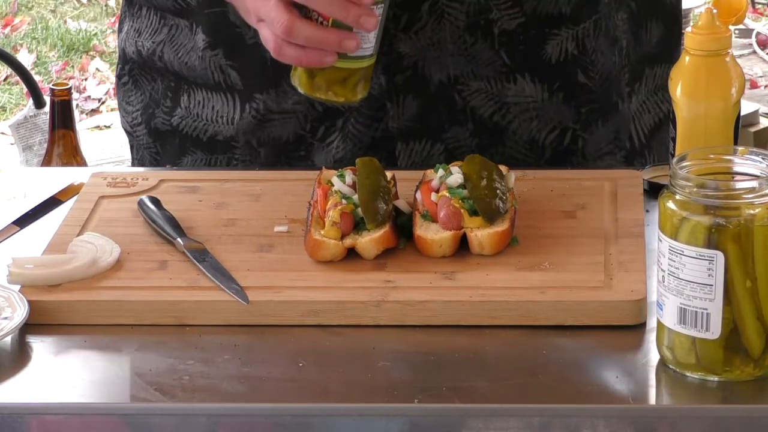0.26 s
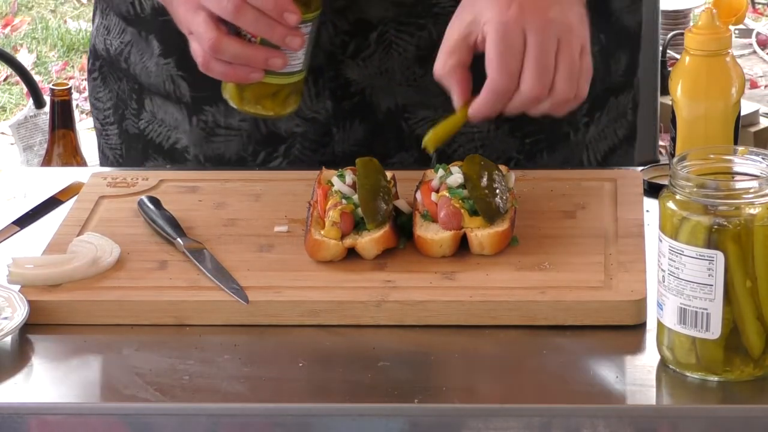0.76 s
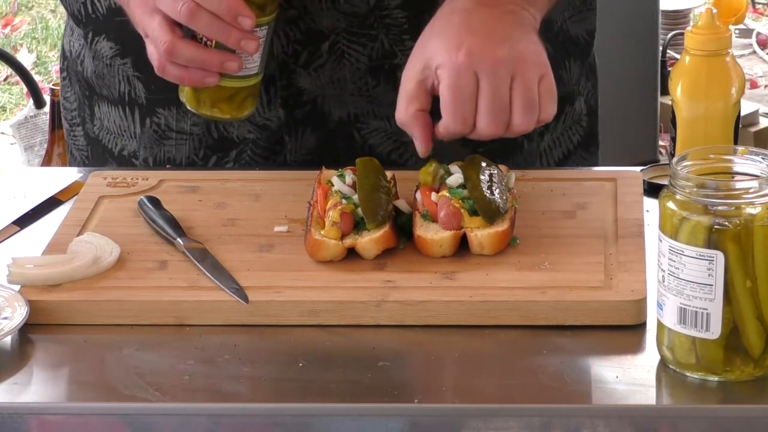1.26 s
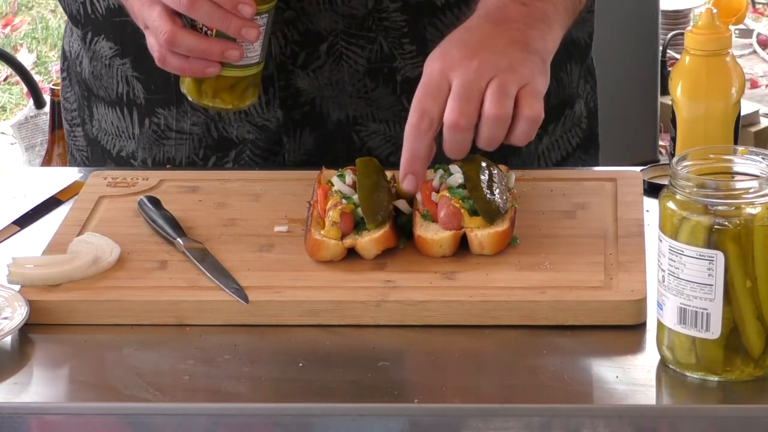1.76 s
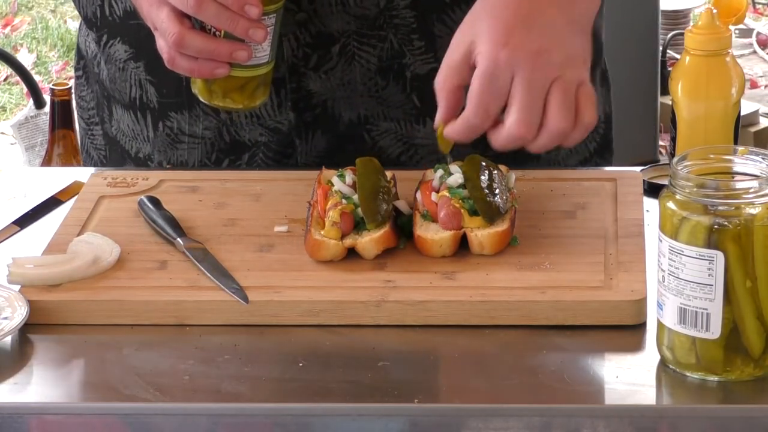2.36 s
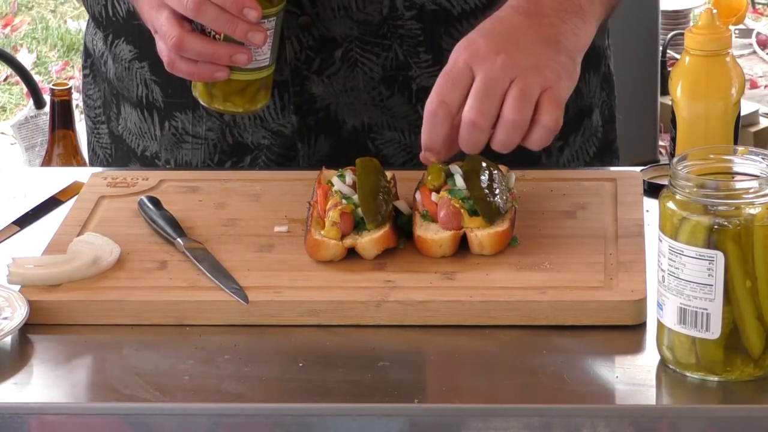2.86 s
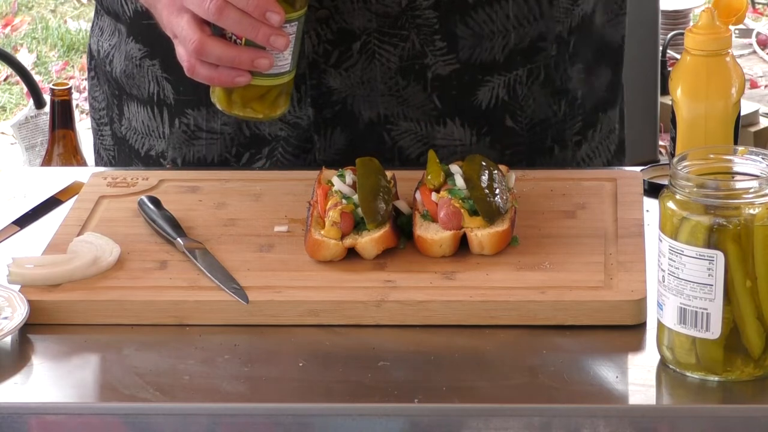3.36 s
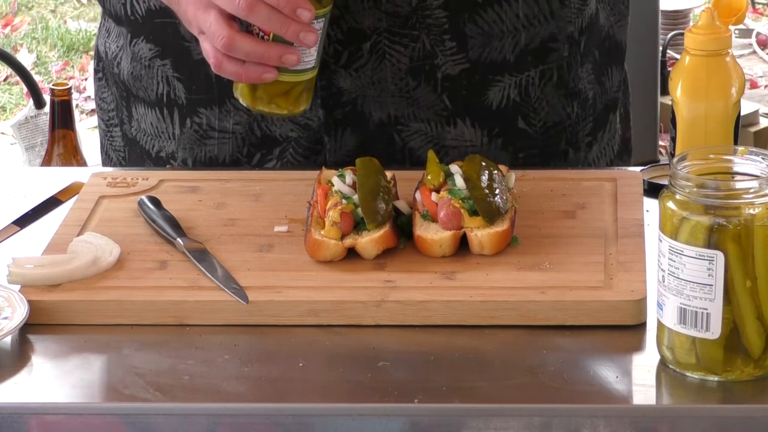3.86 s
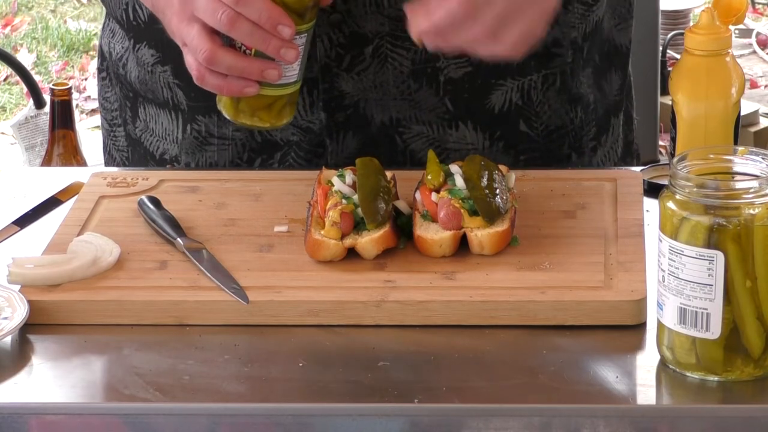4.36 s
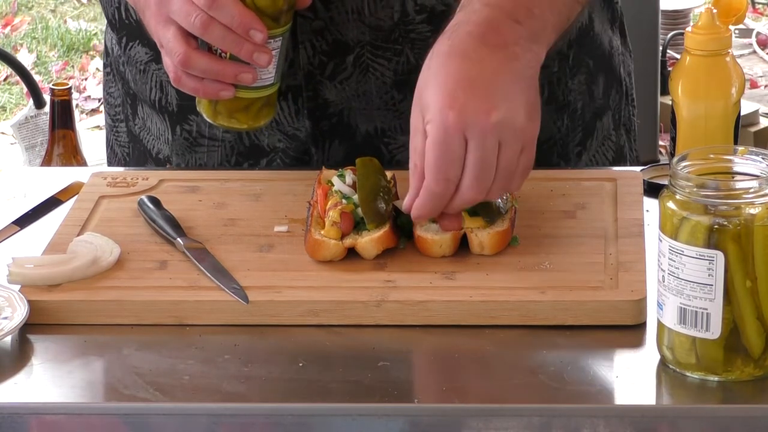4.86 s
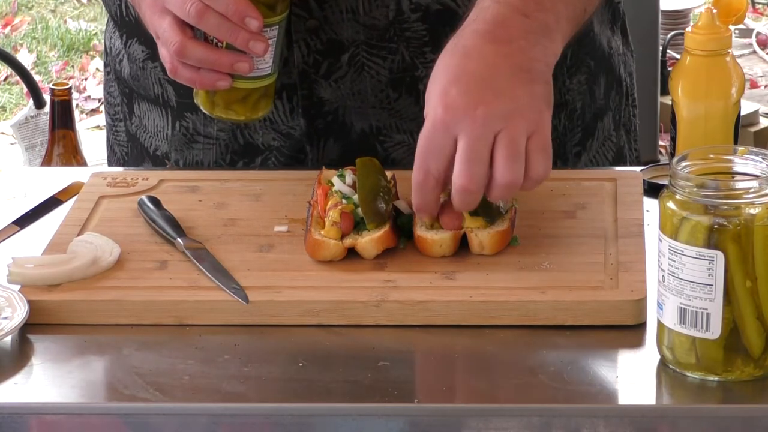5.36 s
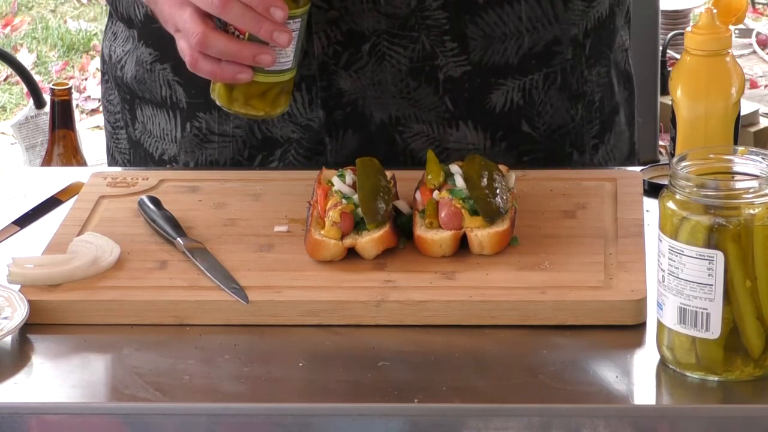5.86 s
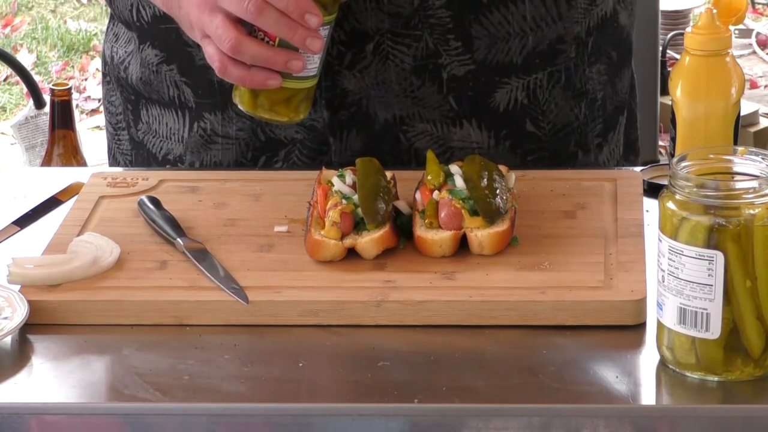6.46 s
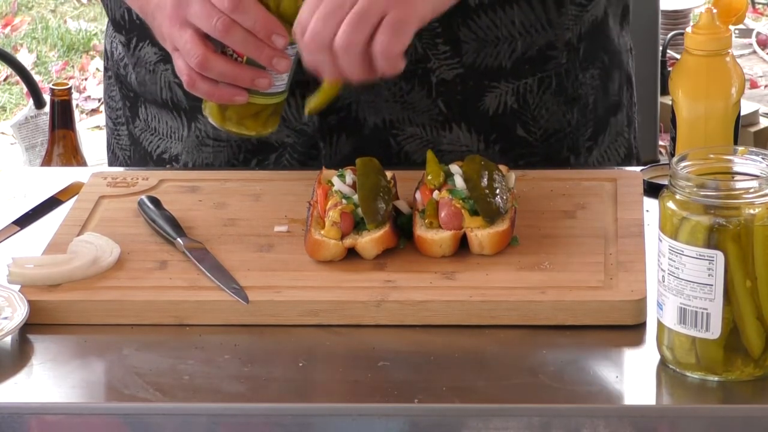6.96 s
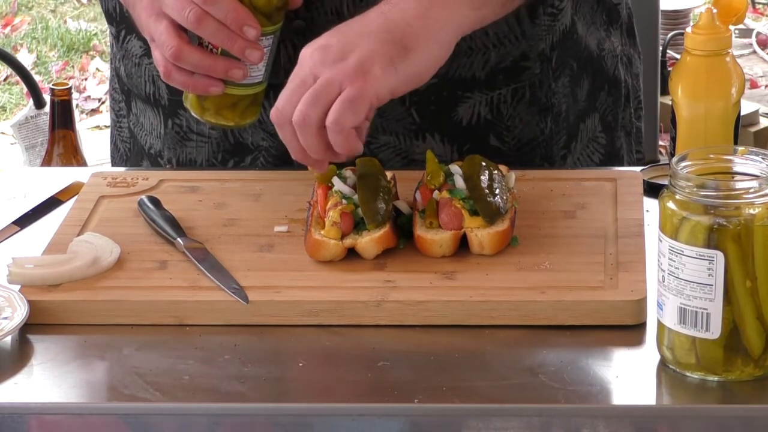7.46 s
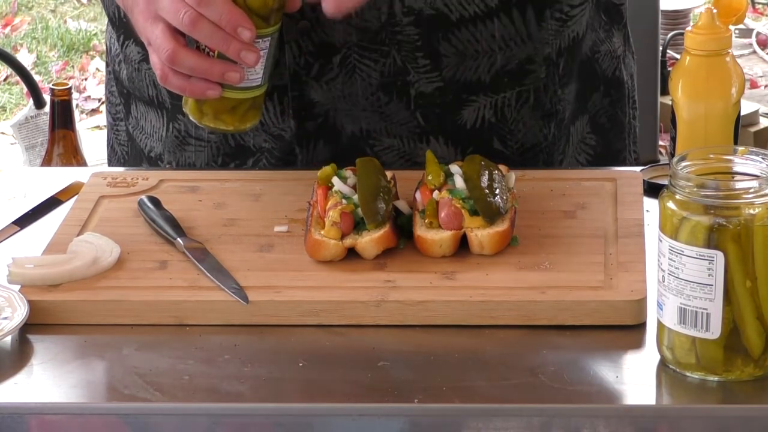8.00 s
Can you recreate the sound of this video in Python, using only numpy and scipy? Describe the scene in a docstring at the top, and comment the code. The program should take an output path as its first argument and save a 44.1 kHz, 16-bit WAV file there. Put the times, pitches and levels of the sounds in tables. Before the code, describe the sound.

Soft hand brushes and wet pickle squeaks sound over a far plane's low, swelling hum, hissing leaves and thin insect trills.

```python
"""Distant plane over a back yard

A far engine, probably a propeller plane, drones past while someone lays pickles on hot dogs.
Its low note sinks slowly, swelling and fading as paths through the air add and cancel, over a soft roar.
Close by, the hands make soft brushes, wet clicks and squeaks. Insects trill and tick; leaves hiss."""
import sys
import numpy as np
from scipy import signal
from scipy.fft import rfft, irfft, next_fast_len
from scipy.io import wavfile

SR = 44100
rng = np.random.default_rng(int(sys.argv[2]) if len(sys.argv) > 2 else 0)


def inscribe(sig):
    """Save sig as 16-bit PCM at rate SR to the path in sys.argv[1].

    A 1-D sig is mono; a 2-D sig holds one channel per row.
    Samples are clipped to [-1, 1] before scaling.
    """
    pcm = np.round(np.clip(np.atleast_2d(sig).T, -1, 1) * 32767)
    wavfile.write(sys.argv[1], SR, pcm.astype(np.int16))


N = 363119
TIME = np.arange(N) / SR

# Fader rides for the plane's low note, its octave and its upper harmonics: t/s, level/dB
LOW_NOTE_RIDE = [(0, -32.5), (.55, -34), (1.05, -27.5), (2.45, -26.5), (2.8, -21.5), (6.5, -21),
                 (8.23, -22)]
OCTAVE_RIDE = [(0, -39), (1.15, -39.5), (2.15, -42.5), (2.8, -51.5), (3.4, -42), (4.8, -37.5), (7.3, -37.5),
               (7.9, -44), (8.23, -38.5)]
UPPER_RIDE = [(0, -59), (1.85, -52), (2.5, -43.5), (3.9, -47), (5.0, -54.5), (5.55, -44), (5.9, -49),
              (6.5, -39.5), (7.1, -48.5), (7.65, -45)]


def propeller(start_hz=94.3, sag_hz_per_s=0.69, wander_hz=0.2, fourth_db=-11.5):
    """Four harmonics of the blade rate, sinking as the plane goes by and fluttering in turbulent air."""
    blade_hz = start_hz - sag_hz_per_s * TIME + wander_hz * drift(0.85)
    phase = 2 * np.pi * np.cumsum(blade_hz) / SR

    def harmonic(level_db, order, flutter, flutter_hz):
        """A steady direct path plus scattered sound."""
        scatter = flutter * (drift(flutter_hz) + 1j * drift(flutter_hz))
        path = (1 + scatter) / np.sqrt(1 + 2 * flutter ** 2)
        tone = np.exp(1j * (order * phase + 2 * np.pi * rng.random()))
        return np.sqrt(2) * amp(level_db) * (path * tone).real

    low_db = curve(LOW_NOTE_RIDE) + interference(order=1)
    octave_db = curve(OCTAVE_RIDE) + interference(order=2)
    upper_db = curve(UPPER_RIDE)
    return (harmonic(low_db, order=1, flutter=0.087, flutter_hz=9.7)
            + harmonic(octave_db, order=2, flutter=0.24, flutter_hz=10)
            + harmonic(upper_db, order=3, flutter=0.9, flutter_hz=10.4)
            + harmonic(upper_db + fourth_db, order=4, flutter=0.7, flutter_hz=21))


# Air paths add up and the drone blooms: t/s, half width/s, low note gain/dB, octave gain/dB
PATH_SWELLS = [(1.802, 0.31, 5.5, -1), (3.71, 0.073, 6, 2.5), (4.01, 0.062, 2, 9.5), (4.6, 0.18, 11, 6),
               (5.35, 0.082, -3, 6), (6.02, 0.22, 9, 10), (6.56, 0.08, 1.5, 8.5), (8.17, 0.12, 1.5, 10)]
# Air paths cancel and a harmonic drops out: t/s, half width/s, low note gain/dB, octave gain/dB
PATH_FADES = [(.48, 0.14, -17, -2.5), (.76, 0.27, 2.5, -9.5), (1.76, 0.3, -1.5, -12),
              (3.87, .06, -3.5, -20), (4.22, 0.24, -20, -5.5), (5.08, .36, -19, -9.5),
              (5.66, 0.11, 0.5, -16), (6.3, 0.18, -0.5, -20), (6.92, 0.1, -1, -12), (7.14, .15, -25, 0),
              (7.44, 0.2, -7, -0.5)]


def interference(order):
    """Gain in dB on the first or second harmonic as paths through the air slip in and out of phase."""
    gain_db = np.zeros(N)
    for s, width, *db in PATH_SWELLS:
        gain_db += db[order - 1] * bell((TIME - s) / width)
    for s, width, *db in PATH_FADES:
        slip = ((TIME - s) / width) ** 2
        gain_db += 10 * np.log10((slip + amp(db[order - 1]) ** 2) / (slip + 1))  # notch, wide shoulders
    return gain_db


# Wet clicks and squeaks of the pickles: t/s, level/dB, f/Hz, width/Hz, attack/s, decay/s
PICKLE_SQUEAKS = [(.322, -41, 2200, 900, .001, .003), (.587, -44.5, 3200, 1000, .002, .008),
                  (.648, -54, 12850, 260, .003, .025), (2.902, -41, 3000, 900, .001, .005),
                  (3.672, -39, 6570, 180, .002, .004), (3.672, -41, 4350, 250, .002, .006),
                  (4.261, -42, 1650, 600, .002, .004), (4.261, -42, 3450, 800, .002, .005),
                  (5.002, -45, 3100, 900, .001, .004), (5.962, -42, 4300, 140, .008, .018),
                  (7.31, -61, 14000, 400, .03, .03)]


def pickle_squeaks(size=4096, rasp_gain=0.75):
    """Wet skin slips: a wavering ring and a short rasp in the same band."""
    out, t = np.zeros(N), np.arange(size) / SR
    for s, db, hz, width, attack, decay in PICKLE_SQUEAKS:
        waver = noise(lambda f: bell(f / width), size)
        ring = np.sin(2 * np.pi * np.cumsum(hz + 0.5 * width * waver) / SR)
        rasp = noise(lambda f: bell(0.5 * (f - hz) / width), size)
        envelope = np.minimum(t / attack, 1) * np.exp(-np.maximum(t - attack, 0) / decay)
        add(out, s, amp(db) * (ring + rasp_gain * rasp) * envelope)
    return out


# Soft brushes of hand, apron and jar: t/s, length/s, level/dB, f/Hz, width/octaves
HAND_BRUSHES = [(0.123, 0.038, -51, 1980, 0.78), (0.554, .18, -45, 630, 0.34),
                (2.236, 0.18, -38.5, 526, 0.67), (4.096, 0.16, -48, 600, .5),
                (5.958, 0.055, -42.5, 2110, .3), (6.56, .03, -46, 3080, .3), (6.628, 0.059, -42, 3370, .45),
                (7.72, 0.19, -42.5, 436, 0.29), (7.829, .09, -37.5, 750, 0.77),
                (7.84, 0.083, -48, 3000, .35)]


def hand_brushes(grain=0.17):
    """Surfaces rub: short, grainy bands of noise that ease in and out."""
    out = np.zeros(N)
    for s, length, db, hz, octaves in HAND_BRUSHES:
        size = int(length * SR)
        rub = noise(lambda f: bell(np.log2(f / hz) / octaves), size)
        add(out, s, amp(db) * rub * signal.windows.tukey(size, 0.7))
    return out * (1 + grain * drift(120))


# Cues for the clearest ticks in the grass: t/s, level/dB
CLEAR_TICKS = [(.408, -54), (.8155, -53), (1.0755, -51), (1.8312, -52), (1.9854, -46), (2.2383, -49),
               (2.5376, -47.5), (2.6519, -49), (2.7731, -47.5), (2.8185, -45.5), (3.255, -43.5),
               (3.7125, -50), (3.91, -52), (5.1074, -49), (5.2724, -49), (5.3148, -49), (5.4794, -47.5),
               (5.6635, -48.5), (6.5894, -49), (7.5018, -48), (7.7503, -48.5), (8.078, -48)]
# Their thin, bright EQ: f/Hz, gain/dB
TICK_EQ = [(3500, -34), (6500, -0.5), (9000, -2), (11000, 1), (13000, 1), (14200, -5), (15800, -14)]


def insect_ticks(attack_s=0.0008, snap_s=0.005, tail_s=0.039, tail=0.56, grain=0.27, faint_count=56):
    """Tiny dry rasps with a quick snap and a short outdoor tail; fainter ones fall at random."""
    power, t = np.zeros(N), np.arange(6000) / SR
    release = (1 - tail) * np.exp(-t / snap_s) + tail * np.exp(-t / tail_s)
    envelope = np.minimum(t / attack_s, 1) * release
    jitter, weakness = rng.random((faint_count, 2)).T
    faint_at = ((np.arange(faint_count) + jitter) / faint_count * N).astype(int)
    faint_db = curve(BED_RIDE, column=2)[faint_at] - 1 - 7 * weakness  # 1 to 8 dB under the hiss fader
    for s, db in list(CLEAR_TICKS) + list(zip(TIME[faint_at], faint_db)):
        add(power, s, (amp(db) * envelope) ** 2)
    rasp = coloured(TICK_EQ) * np.sqrt(power) * (1 + grain * drift(300))
    return reflections(rasp, wet=0.27)


# Fader rides for the background bed: t/s, roar level/dB, hiss level/dB
BED_RIDE = [(0, -42, -50), (.5, -42.5, -53.5), (1.9, -41, -50.5), (2.45, -36.5, -49), (3.3, -36.5, -46.5),
            (6, -36.5, -47.5), (8.23, -34, -47)]
# EQ of the dark engine roar and of the bright leaf hiss: f/Hz, gain/dB
ROAR_EQ = [(30, 2), (48, 5.5), (73, 10.5), (100, 10.5), (125, 1.5), (235, 0), (305, -5), (370, -2),
           (520, -6.5), (950, -10), (1200, -10.5), (1450, -19), (2500, -30), (6000, -45.5)]
HISS_EQ = [(400, -7.5), (1200, 1.5), (1900, 1), (2700, 2), (3300, 2.5), (3900, -2.5), (5400, -4.5),
           (6100, -6.5), (7700, -8), (9000, -12.5), (10300, -12), (12600, -12), (14600, -17), (15800, -11)]


def roar_and_hiss(roar_waver_db=0.89, hiss_waver_db=0.61):
    """The engine's dull roar and a hiss of leaves and air, both wavering a little."""
    roar = coloured(ROAR_EQ) * amp(curve(BED_RIDE, column=1) + roar_waver_db * drift(2.7))
    hiss = coloured(HISS_EQ) * amp(curve(BED_RIDE, column=2) + hiss_waver_db * drift(4.3))
    return roar + reflections(hiss, wet=0.23)


# Far insect voices: f/Hz, width/Hz, start level/dB, midway level/dB, end level/dB
TRILL_BANDS = [(2750, 24, -72, -64.5, -68), (4520, 70, -70, -63.5, -71), (4635, 50, -74, -65, -72),
               (5165, 70, -67, -65, -65), (5238, 34, -65.5, -62.5, -60.5), (5440, 60, -76, -69, -76),
               (6342, 40, -82, -63.5, -68), (6880, 90, -80, -72, -73)]


def insect_trills(swell_db=1.5):
    """Far trills blur into narrow, shimmering bands that wax and wane."""
    out = np.zeros(N)
    for hz, width, *db in TRILL_BANDS:
        ride_db = np.interp(TIME, np.linspace(0, TIME[-1], len(db)), db)
        out += amp(ride_db + swell_db * drift(3.5)) * noise(lambda f: bell(2 * (f - hz) / width))
    return out


def reflections(x, wet, count=30, spread_s=0.013):
    """Early echoes off the table, board and jars ripple the spectrum."""
    size = int(spread_s * SR)
    taps = np.zeros(size)
    taps[rng.integers(1, size, count)] = rng.standard_normal(count)
    taps *= wet / np.linalg.norm(taps)
    taps[0] = 1  # direct sound
    return signal.oaconvolve(x, taps / np.linalg.norm(taps))[:len(x)]


def amp(db):
    """Decibels to gain."""
    return 10 ** (np.asarray(db) / 20)


def curve(rows, column=1):
    """One column of a fader ride, at every sample."""
    rows = np.array(rows)
    return np.interp(TIME, rows[:, 0], rows[:, column])


def noise(shape, size=N):
    """Noise of rms 1 whose spectrum follows shape(Hz)."""
    padded = next_fast_len(size)
    hz = np.fft.rfftfreq(padded, 1 / SR) + 1e-3
    spectrum = rfft(rng.standard_normal(padded)) * shape(hz)
    x = irfft(spectrum, padded)[:size]
    return x / np.sqrt(np.mean(x ** 2) + 1e-20)


def coloured(eq):
    """Noise of rms 1 shaped by an EQ curve."""
    hz, db = np.transpose(eq)
    return noise(lambda f: amp(np.interp(np.log(f), np.log(hz), db)))


def bell(x):
    """A smooth hump of height 1 around zero."""
    return np.exp(-x ** 2 / 2)


def drift(rate_hz):
    """Smooth random modulation of rms 1."""
    return noise(lambda f: bell(f / rate_hz))


def add(mix, s, sound):
    """Mixes a sound in at time s."""
    part = mix[max(round(s * SR), 0):][:len(sound)]
    part += sound[:len(part)]


def scene():
    """The mono mix, heard from one spot at the table."""
    yard = propeller() + roar_and_hiss() + insect_trills() + insect_ticks()
    return (yard + hand_brushes() + pickle_squeaks())[None]


def record(dry, cutoff_hz=15780):
    """A steep high cut on the whole mix."""
    high_cut = signal.firwin(801, cutoff_hz, window=("kaiser", 9), fs=SR)
    return signal.oaconvolve(dry, high_cut[None], "same")


dry = scene()
out = record(dry)
inscribe(out)
```